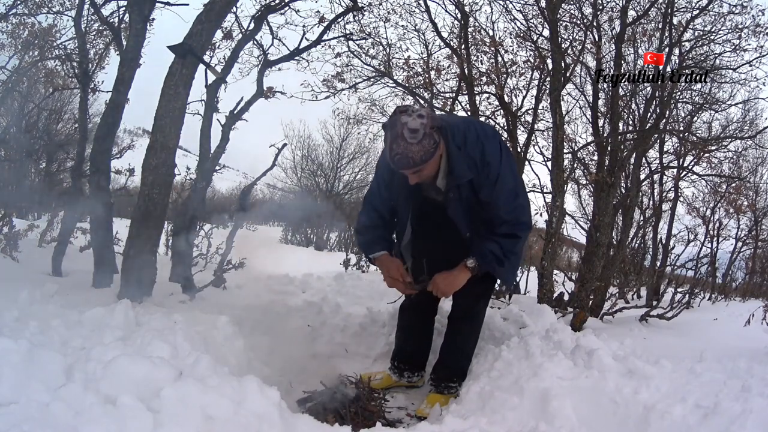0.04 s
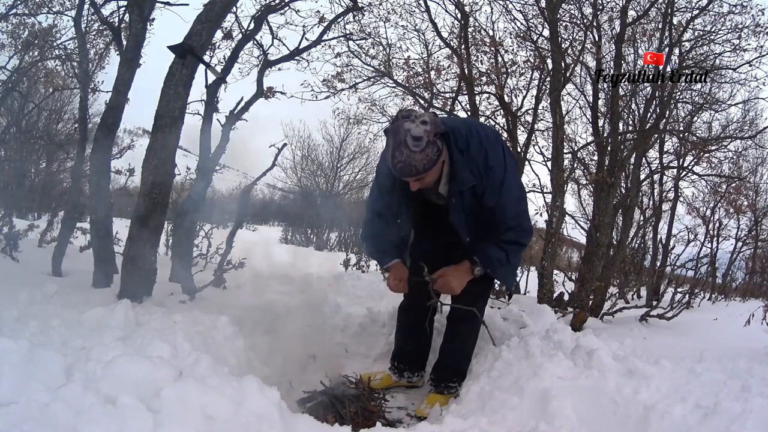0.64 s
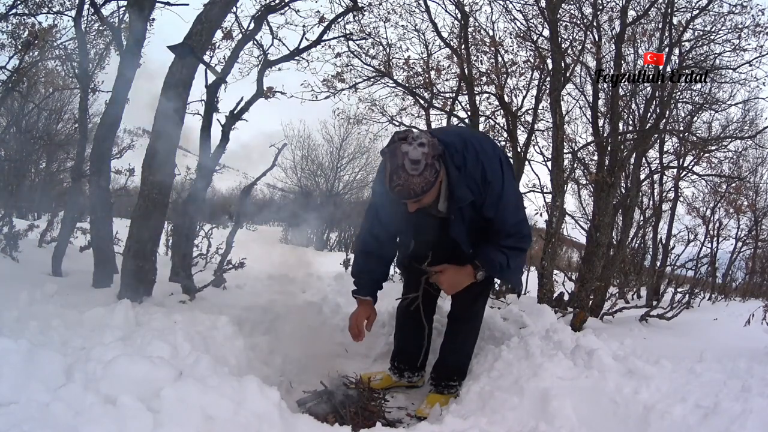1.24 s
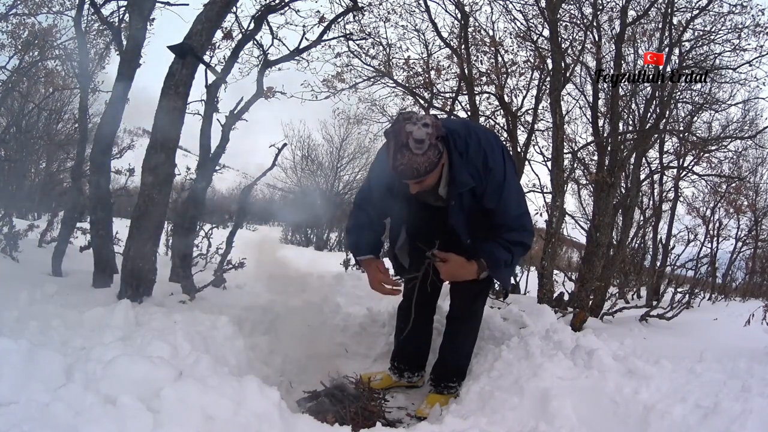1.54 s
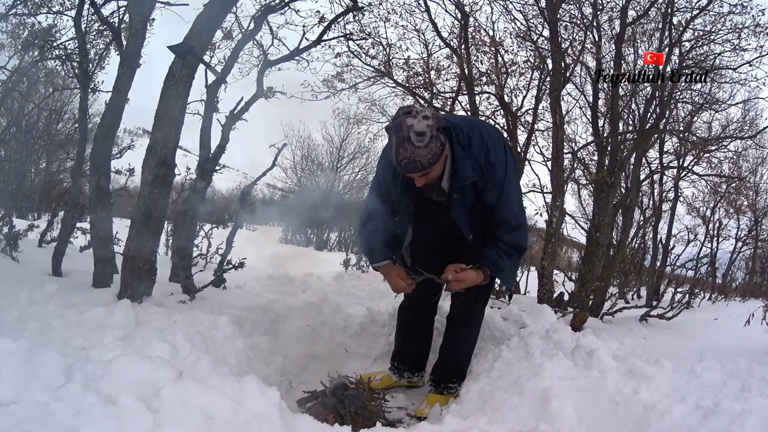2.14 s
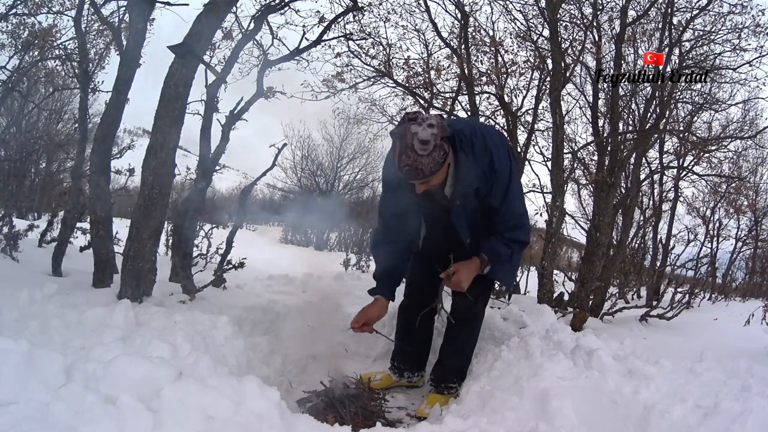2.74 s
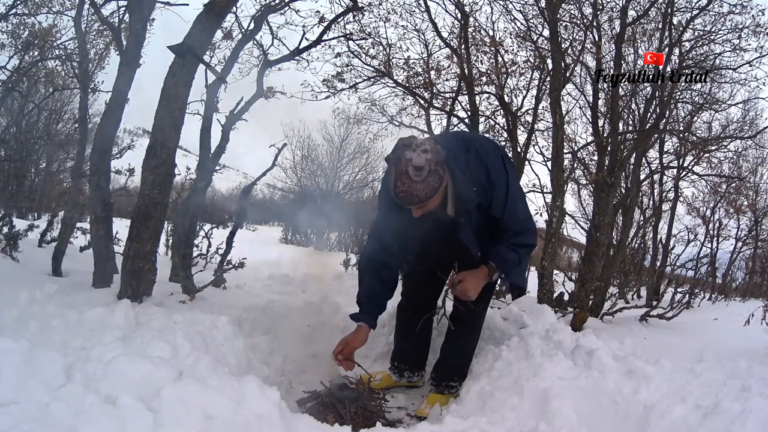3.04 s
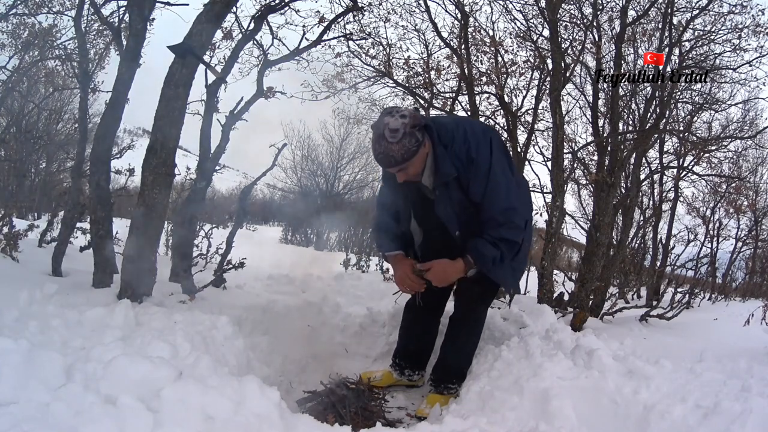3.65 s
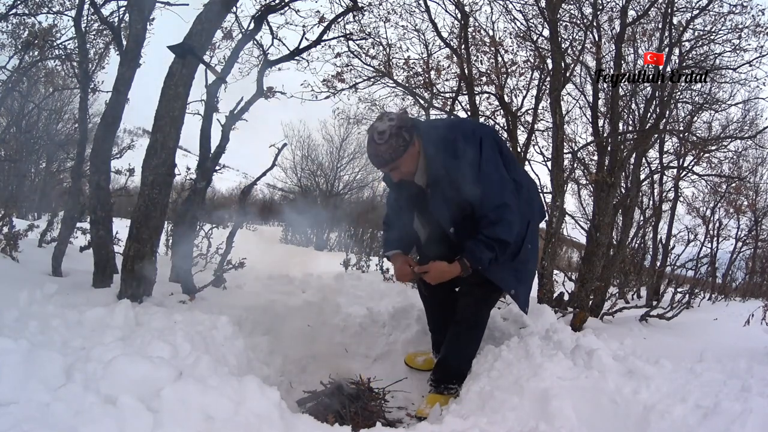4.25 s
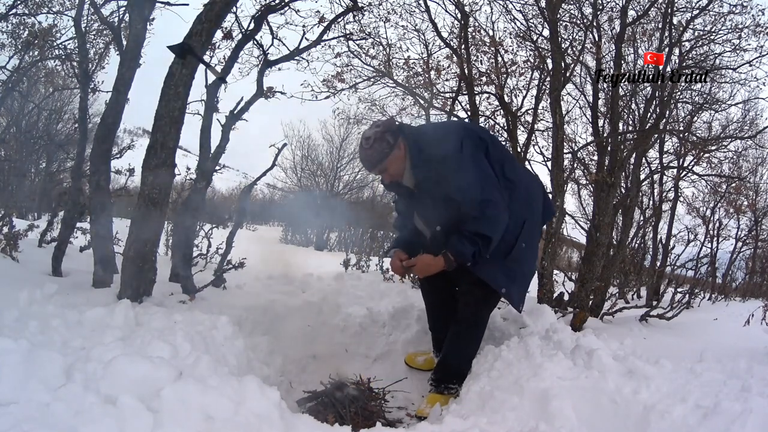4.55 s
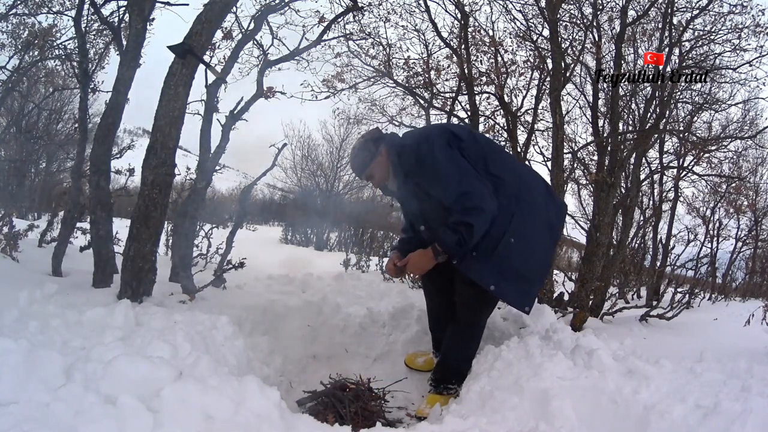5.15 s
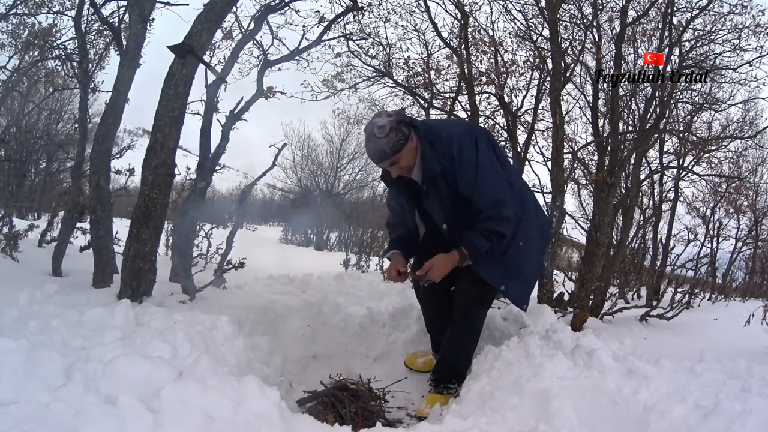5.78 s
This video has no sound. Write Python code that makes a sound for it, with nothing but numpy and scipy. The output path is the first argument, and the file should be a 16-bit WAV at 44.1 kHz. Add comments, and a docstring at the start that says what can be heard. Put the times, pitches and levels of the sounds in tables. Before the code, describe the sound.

Dry twigs snap and tick by hand outdoors, with a faint jacket swish and dull boot steps in snow.

```python
"""Dry twigs, bent and snapped by hand a few steps away in a snowy wood.
Each break is a brief fracture that rings the stick and scatters off nearby trunks;
thin twigs tick, bark flakes, dragged sticks rasp. A jacket swishes as the arms move,
boots scuff and thud in the snow, and faint air hangs over everything."""
import sys
import numpy as np
from scipy import signal
from scipy.fft import rfft, irfft, next_fast_len
from scipy.io import wavfile
from scipy.ndimage import uniform_filter1d, map_coordinates

SR = 44100
rng = np.random.default_rng(int(sys.argv[2]) if len(sys.argv) > 2 else 0)


def wav_out(sig):
    """Save sig, one row per channel (or a flat mono array), as 16-bit PCM at SR to the path in sys.argv[1]."""
    wavfile.write(sys.argv[1], SR, np.round(np.clip(np.atleast_2d(sig).T, -1, 1) * 32767).astype(np.int16))


N = 265261
REST_DB = -72  # nylon rustle between arm strokes


def amp(db):
    """dB to gain."""
    return 10 ** (np.asarray(db) / 20)


def unit(x):
    """Scale to rms 1."""
    return x / np.sqrt(np.mean(x ** 2) + 1e-20)


def along(points, hz):
    """Interpolate (f/Hz, value) rows on a log axis."""
    f, v = np.transpose(points)
    return np.interp(np.log(hz + 1), np.log(f + 1), v)


def curve(rows):
    """Interpolate (t/s, value) rows per sample."""
    return np.interp(np.arange(N) / SR, *np.transpose(rows))


def wobble(rate_hz):
    """Smooth random curve, knots at rate_hz."""
    knots = rng.standard_normal(int(N * rate_hz / SR) + 4)
    return map_coordinates(knots, [np.arange(N) * rate_hz / SR])


def swells(rows, shape=2, rate_hz=1000):
    """Gain per sample from (t/s, level/dB, half-width/s) rows; lower shape, longer skirts."""
    t = np.arange(int(N * rate_hz / SR) + 2) / rate_hz
    gain = sum(amp(db) * np.exp(-abs((t - s) / half_s) ** shape) for s, db, half_s in rows)
    return curve(np.transpose([t, gain]))


def filtered(x, response):
    """Apply response(f/Hz) to x."""
    m = next_fast_len(N + SR // 2)
    return irfft(rfft(x, m) * response(np.fft.rfftfreq(m, 1 / SR)), m)[..., :N]


def causal(gain):
    """Minimum-phase pulse with this magnitude spectrum."""
    cepstrum = irfft(np.log(np.maximum(gain, 1e-6)))
    half = len(cepstrum) // 2
    cepstrum[1:half] *= 2
    cepstrum[half + 1:] = 0
    return irfft(np.exp(rfft(cepstrum)))


def whitened(x, bins=45):
    """Flatten a burst's broad colour, keep its fine ripple."""
    z = rfft(x)
    colour = np.sqrt(abs(uniform_filter1d(abs(z) ** 2, bins)) + 1e-12)
    return irfft(z * rfft(causal(1 / colour)))


def resonance(hz, centre_hz, q):
    """Magnitude of one resonance, peak 1."""
    return 1 / np.sqrt(1 + (q * (hz / centre_hz - centre_hz / (hz + 1))) ** 2)


def add(track, s, sound):
    """Mix sound into track from time s."""
    start = max(0, round(s * SR))
    span = track[start:start + len(sound)]
    span += sound[:len(span)]


def spread(pair, spectrum, correlation=None):
    """Two independent signals to coloured stereo, rms 1."""
    # nearby sounds: f/Hz, L-R correlation
    nearby = [(40, 0.8), (110, 0.99), (200, 0.91), (500, 1), (1300, 0.95), (4000, 1), (14000, 1)]

    def response(hz):
        angle = np.arccos(np.clip(along(correlation or nearby, hz), -1, 1)) / 2
        return amp(along(spectrum, hz)) * [np.cos(angle), np.sin(angle)]

    mid, side = filtered(pair, response)
    return unit(np.array([mid + side, mid - side]))


def rush(spectrum, grain_db):
    """Stereo noise of tiny, uneven contacts."""
    return spread(rng.standard_normal((2, N)) * amp(grain_db * rng.standard_normal(N)), spectrum)


def air(stir_db=-6, lumps_db=4, hush_db=-62.5):
    """Uneven low stir over the wood's steady, diffuse hush."""
    # stir contour: t/s, level/dB
    contour = [(0, -67), (0.16, -65), (0.5, -66.5), (0.95, -60), (1.5, -63), (1.9, -68.5), (2.9, -67.5),
               (3.36, -64), (3.5, -61.5), (4.2, -61.5), (4.62, -55), (4.87, -60.5), (5.15, -56),
               (5.37, -63.5), (5.8, -58.5), (6.01, -55)]
    # stir and hush spectra: f/Hz, level/dB
    stir_spectrum = [(10, -14), (25, 1), (70, 0.5), (130, -6), (250, -14), (500, -17), (1200, -36)]
    hush_spectrum = [(20, 4.5), (200, -5.5), (600, -2), (1300, -7), (2000, -10.5), (6000, -18.5),
                     (15500, -20.5)]
    # diffuse air: f/Hz, L-R correlation
    diffuse = [(40, 0.56), (200, -0.26), (380, -0.78), (700, -0.78), (1300, -0.8), (2400, -0.37),
               (4400, -0.41), (8000, 0.88), (15000, 1)]
    stir = amp(curve(contour) + stir_db + lumps_db * wobble(19)) * rush(stir_spectrum, grain_db=1.5)
    hush = amp(hush_db) * spread(rng.standard_normal((2, N)), hush_spectrum, diffuse)
    return stir + hush


def sleeves_db():
    """Level of rubbing nylon: arm strokes over a resting rustle."""
    # arm strokes: t/s, level/dB, half-width/s
    strokes = [(0.69, -70, 0.13), (0.97, -62, 0.095), (1.22, -74.5, 0.05), (1.87, -78, 0.053),
               (2.24, -72.5, 0.19), (2.48, -55.5, 0.12), (2.67, -52, 0.079), (2.82, -75.5, 0.097),
               (3.03, -62, 0.11), (3.31, -59.5, 0.088), (3.4, -63.5, 0.01), (3.45, -61.5, 0.064),
               (3.92, -70.5, 0.15), (4.055, -61, 0.02), (4.38, -70, 0.072), (4.8, -77.5, 0.22),
               (5.33, -68.5, 0.11), (5.75, -60, 0.099)]
    return 20 * np.log10(amp(REST_DB) + swells(strokes, shape=1.35))


def jacket(flutter_db=2.16, coat_rest_db=-75.5, coat_db_per_db=0.68):
    """Sleeves hiss over the coat; its heavier cloth adds a hollow swish."""
    # fabric spectra: f/Hz, level/dB
    nylon_spectrum = [(900, -30), (2000, -6), (3300, 1), (6500, -2), (9000, -5.5), (12000, -8.5),
                      (15500, -11)]
    cloth_spectrum = [(150, -10.5), (300, 0.5), (700, -8.5), (1050, -5), (1400, -1.5), (1900, -6),
                      (2600, -13), (6000, -46)]
    folds_db = flutter_db * wobble(45)
    coat_db = coat_rest_db + coat_db_per_db * (sleeves_db() - REST_DB)
    nylon = amp(sleeves_db() + folds_db) * rush(nylon_spectrum, grain_db=2.0)
    cloth = amp(coat_db + folds_db) * rush(cloth_spectrum, grain_db=3.5)
    return nylon + cloth


def bark(rate_hz=90, over_sleeves_db=15, scatter_db=3):
    """Bark flakes tick faintly, harder as the arms move."""
    size, polarity = rng.standard_normal((2, N))
    strength = amp(sleeves_db() + over_sleeves_db + scatter_db * np.clip(size, -2, 2))
    flakes = (rng.random(N) < rate_hz / SR) * strength * np.sign(polarity)
    return filtered(flakes, lambda hz: resonance(hz, 9600, q=0.63))


def crack(crack_db, crack_hz, crack_q, ring_db, ring_hz, ring_q, knock_db, t60_s, splinter_db,
          uneven_db=4, knock_hz=500, knock_q=1.34, low_cut_hz=400, travel_s=0.00073, size=2048):
    """The first fibres fail at once, the rest splinter after; both ring the stick."""
    hz, t = np.fft.rfftfreq(size, 1 / SR), np.arange(size) / SR
    fibres = rng.standard_normal(size) * amp(uneven_db * rng.standard_normal(size) - 60 * t / t60_s)
    fracture = amp(splinter_db) * fibres / np.linalg.norm(fibres)
    fracture[0] += 1  # first failure
    snap = amp(crack_db) * resonance(hz, crack_hz, crack_q)
    ring = amp(ring_db) * resonance(hz, ring_hz, ring_q)
    knock = amp(knock_db) * resonance(hz, knock_hz, knock_q)
    radiation = hz ** 2 / (hz ** 2 + low_cut_hz ** 2)  # a thin stick radiates little bass
    magnitude = np.hypot(np.hypot(snap, ring) * radiation, knock)
    # bending waves run faster at high f; travel_s holds at 1 kHz
    dispersion = np.exp(-4j * np.pi * travel_s * np.sqrt(hz * 1000))
    pulse = irfft(rfft(causal(magnitude)) * dispersion)
    sound = signal.fftconvolve(whitened(fracture), pulse)
    return sound * np.linalg.norm(pulse) / np.linalg.norm(sound)


def tick(ring_db, ring_hz, crack_db, knock_db):
    """A few fibres give way in a thin twig."""
    return crack(crack_db, crack_hz=9500, crack_q=0.89, ring_db=ring_db, ring_hz=ring_hz, ring_q=1.39,
                 knock_db=knock_db, t60_s=0.013, splinter_db=0.5)


def twigs(ring_q=1.34):
    """Sticks break right through; twigs tick as they bend and touch."""
    # breaks: t/s, crack/dB, crack/Hz, crack Q, ring/dB, ring/Hz, knock/dB, splinter t60/s
    snaps = [(0.3867, 2, 8200, 2.5, -14, 1040, -35, 0.017), (2.3898, 2, 9500, 0.91, 6, 1390, -9, 0.0092),
             (2.3904, 3.5, 9250, 1.8, 5.5, 2520, -18, 0.012),
             (4.1792, 9.5, 8700, 3.1, -13, 3730, -23, 0.0058),
             (4.2749, 1.5, 8850, 3.4, -10.5, 3500, -28, 0.014),
             (4.4521, -3.5, 7500, 2.3, -13, 4000, -24, 0.0082),
             (4.9439, -6, 10100, 0.74, -9, 1990, -19, 0.027)]
    # light ticks: t/s, ring/dB, ring/Hz, crack/dB, knock/dB
    ticks = [(0.083, -28.5, 6400, -39, -45), (0.112, -30.5, 7040, -42, -50),
             (0.2317, -24, 2520, -24.5, -17.5), (0.2514, -25, 4470, -40, -50),
             (0.2622, -24, 4200, -19, -47), (0.304, -15, 2300, -20, -14.5), (0.376, -34, 4400, -31, -38),
             (0.4278, -27.5, 6800, -38, -50), (0.516, -27, 5540, -30, -43),
             (0.604, -20.5, 3220, -21.5, -36), (1.154, -40, 4900, -29, -50), (1.2482, -17, 4750, -29, -29),
             (1.4095, -28.5, 7100, -45, -23), (1.7384, -23, 1380, -51, -28), (1.8359, -23, 5070, -30, -38),
             (1.891, -28.5, 4500, -34, -35), (2.023, -31, 5800, -29, -31), (2.3327, -14.5, 3870, -16, -16),
             (2.3384, -26, 8000, -21, -28), (2.3672, -13, 9300, -25, -42), (2.3868, -25, 4000, -12, -35),
             (2.4811, -14.5, 4150, -31, -30), (2.4888, -19, 4000, -20, -41), (2.6008, -22, 4330, -20, -22),
             (2.6158, -10.5, 3300, -10.5, -13.5), (2.6257, -10.5, 3500, -20, -19.5),
             (2.9658, -24, 3180, -25, -24), (3.0674, -8, 2560, -28, -16), (3.0945, -14.5, 1210, -45, -27),
             (3.1337, -23.5, 2600, -30.5, -28), (3.171, -28, 5500, -31, -42), (3.488, -25, 4400, -28, -39),
             (3.7485, -29, 1900, -32.5, -20), (3.8928, -17.5, 5200, -21.5, -20),
             (3.9403, -22.5, 3340, -35, -23), (4.258, -42, 7000, -31, -50), (4.3018, -17.5, 2600, -26, -12),
             (4.3301, -25, 6200, -22.5, -48), (4.389, -39, 4000, -23, -45), (4.4179, -9, 7540, -25, -44),
             (4.4215, -12, 7800, -24, -45), (4.487, -26.5, 6960, -45, -50), (4.7217, -16, 7400, -40, -47),
             (4.8429, -11.5, 2540, -22, -11.5), (4.8443, -13.5, 6300, -29, -27),
             (4.9405, -23, 7500, -32, -47), (5.175, -16, 3130, -24.5, -14), (5.2688, -24, 4600, -32, -23),
             (5.4426, -19, 5560, -27, -14), (5.7388, -21, 3720, -25.5, -49), (5.766, -16.5, 4340, -48, -42),
             (5.8005, -17.5, 2480, -14, -30), (6.0014, -22.5, 2390, -38, -12.5)]
    track = np.zeros(N)
    for s, db, hz, q, ring_db, ring_hz, knock_db, t60_s in snaps:
        add(track, s, crack(db, hz, q, ring_db, ring_hz, ring_q, knock_db, t60_s, splinter_db=-1))
    for s, *twig in ticks:
        add(track, s, tick(*twig))
    return track


def tips(rate_hz=5, over_sleeves_db=30, scatter_db=2, centre_hz=6500, scatter_oct=0.46):
    """Twig ends brush at random times, harder as the arms move."""
    track, motion_db = np.zeros(N), sleeves_db()
    draws = rng.standard_normal((round(rate_hz * N / SR), 2))
    for (strength, pitch), at in zip(draws, rng.integers(0, N, len(draws))):
        db = motion_db[at] + over_sleeves_db + scatter_db * strength
        hz = centre_hz * 2 ** (scatter_oct * pitch)
        add(track, at / SR, tick(db, hz, crack_db=db - 3, knock_db=db - 10))
    return track


def scuffs():
    """Sliding soles grind the snow in soft, grainy swells."""
    # slides: t/s, level/dB, half-width/s
    slides = [(0.145, -58, 0.012), (0.278, -54, 0.0086), (0.351, -59, 0.035), (2.027, -58, 0.0073),
              (2.343, -54.5, 0.0074), (3.071, -59.5, 0.029), (3.15, -59, 0.027), (3.406, -54.5, 0.022),
              (4.061, -54.5, 0.024), (4.16, -54, 0.054), (4.309, -46, 0.0076)]
    # grinding snow: f/Hz, level/dB
    snow_spectrum = [(70, -8.5), (140, 0), (220, -7), (380, -11.5), (600, -18.5), (1500, -44)]
    return swells(slides) * rush(snow_spectrum, grain_db=3.5)


def boots(half_width_cycles=0.73, max_lag_s=0.0029, crumble_depth=0.54):
    """Snow yields in short, dull pushes; the right channel leads."""
    # treads: t/s, base level/dB, base f/Hz
    treads = [(0.156, -47, 100), (1.039, -46.5, 110), (1.35, -51.5, 55), (2.133, -53, 70.5),
              (3.338, -48.5, 85), (4.352, -49, 78), (4.449, -32, 115.5), (4.541, -47, 95), (4.581, -39, 90),
              (4.638, -43.5, 100), (4.684, -40, 93.8), (4.774, -50, 70), (5.088, -33.5, 114.1),
              (5.249, -31, 109.5), (5.823, -49.5, 92)]
    # heel, sole, settling: delay/s, offset/dB, f ratio
    stages = [(-0.016, -7.5, 0.65), (0, 1, 0.83), (0.024, -9, 0.85)]
    track = np.zeros(N)
    t = np.arange(-SR // 10, SR // 10) / SR
    for s, db, hz in treads:
        for delay_s, offset_db, ratio in stages:
            cycles = t * hz * ratio
            window = np.exp(-(cycles / half_width_cycles) ** 2)
            push = window * np.cos(2 * np.pi * (cycles + rng.random()))
            add(track, s + delay_s + t[0], amp(db + offset_db) * push)
    track *= 1 + crumble_depth * wobble(250)
    lead_rad = lambda hz: np.minimum(np.pi * hz * max_lag_s, np.pi / 4)
    return filtered(track, lambda hz: np.exp(1j * lead_rad(hz) * np.array([[-1], [1]])))


def stick_ends(attack_s=0.00049):
    """Freed ends of a thick stick ring briefly, damped by the hands."""
    # bending modes of the four thickest sticks: t/s, f/Hz, level/dB, t60/s
    modes = [(0.3858, 3100, -35, 0.014), (.3867, 4980, -21.5, 0.0089), (2.3895, 1190, -18, 0.0086),
             (2.3902, 3300, -20, 0.0088), (2.3899, 4350, -11.5, 0.0056), (4.1801, 1550, -30, 0.0065),
             (4.1791, 3670, -17.5, 0.0066), (4.1796, 5130, -24, 0.011), (4.944, 1740, -21.5, 0.0079),
             (4.943, 3110, -19.5, 0.0071)]
    track, t = np.zeros(N), np.arange(SR // 10) / SR
    for s, hz, db, t60_s in modes:
        envelope = amp(db - 60 * t / t60_s) * (1 - np.exp(-t / attack_s))
        add(track, s, envelope * np.sin(2 * np.pi * (hz * t + rng.random())))
    return track


def drag(half_width_hz=280, gain_db=1.0, size=16384):
    """Friction drives one broad resonance of a stick sliding in the bundle; free length sets f."""
    # rasps: t/s, level/dB, half-width/s, f/Hz
    rasps = [(0.981, -70, 0.12, 1790), (2.521, -65, 0.041, 1290), (2.698, -59, 0.039, 1370),
             (2.767, -60, 0.023, 1130), (2.86, -63.5, 0.058, 1460), (3.031, -69.5, 0.12, 1850),
             (3.32, -72, 0.035, 1560), (3.451, -71, 0.024, 1200)]
    track = np.zeros(N)
    hz, t = np.fft.rfftfreq(size, 1 / SR), (np.arange(size) - size / 2) / SR
    for s, db, half_s, centre_hz in rasps:
        band = 1 / (1 + ((hz - centre_hz) / half_width_hz) ** 2)
        friction = unit(irfft(rfft(rng.standard_normal(size)) * band))
        add(track, s + t[0], amp(db + gain_db) * np.exp(-(t / half_s) ** 2) * friction)
    return track


def trunks(x, near_db=-10.0, near_t60_s=0.03, far_db=-17.5):
    """Body and snow hollow reflect at once; trees scatter a short, faint tail."""
    # decay among the trunks: f/Hz, t60/s
    far_t60 = [(300, 0.054), (2000, 0.12), (6000, 0.11), (14000, 0.091)]
    t = np.arange(N) / SR
    near = spread(rng.standard_normal((2, N)), spectrum=[(100, 0), (15000, -0.22)],
                  correlation=[(400, 0.18), (1300, 0.8), (4000, 0.86), (12000, 0.61)])
    near *= amp(-60 * t / near_t60_s)
    scatter = spread(rng.standard_normal((2, N)), spectrum=[(100, -17.5), (15000, -9.5)])
    hz, frame_s, bands = signal.stft(scatter[:, :SR // 4], SR, nperseg=128)
    bands *= amp(-60 * frame_s / along(far_t60, hz)[:, None])
    far = signal.istft(bands, SR, nperseg=128)[1]
    tail = amp(far_db) * far / np.linalg.norm(far[0])
    tail += amp(near_db) * near[:, :far.shape[1]] / np.linalg.norm(near[0])
    return signal.fftconvolve(x[None], tail, axes=1)[:, :N]


def scene():
    """Twigs straight ahead; clothing, boots and air around them."""
    wood = twigs() + tips() + stick_ends() + bark() + drag()
    return wood + trunks(wood) + jacket() + boots() + scuffs() + air()


def record(dry, balance_db=-0.03, top_hz=16000, size=2048):
    """Microphone housing colour, then a steep band limit."""
    # housing response: f/Hz, gain/dB
    response = [(1100, 2.5), (1550, 1), (1850, 2.5), (2550, 0.5), (3350, -0.5), (3800, 0.5), (4350, 1),
                (5300, -0.5), (7200, 0), (8000, 1), (9000, -0.5), (12000, -2), (15500, -3)]
    housing = causal(amp(along(response, np.fft.rfftfreq(size, 1 / SR))))
    heard = signal.fftconvolve(dry, housing[None], axes=1)[:, :N] * amp([[-balance_db], [balance_db]])
    return filtered(heard, lambda hz: 1 / np.sqrt(1 + (hz / top_hz) ** 120))


dry = scene()
out = record(dry)
wav_out(out)
```